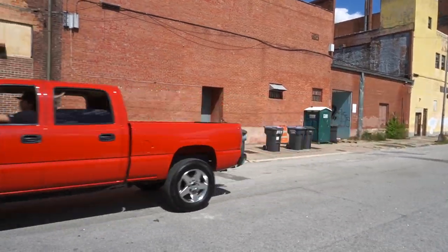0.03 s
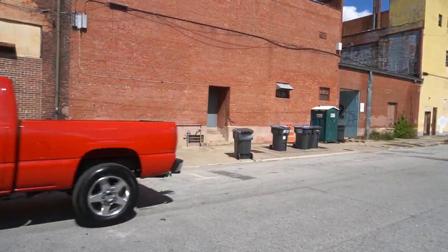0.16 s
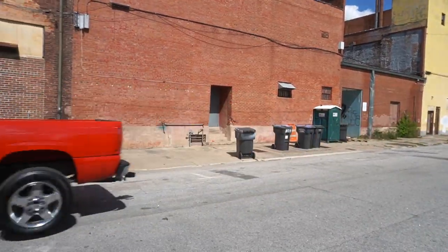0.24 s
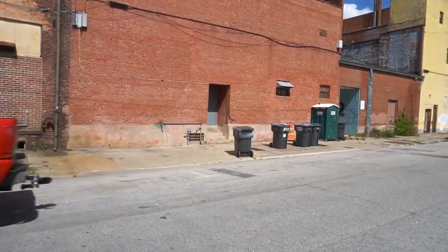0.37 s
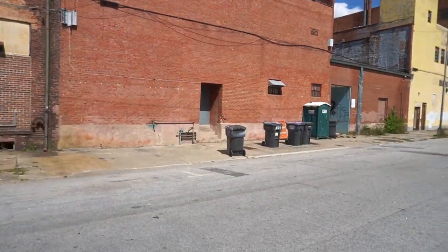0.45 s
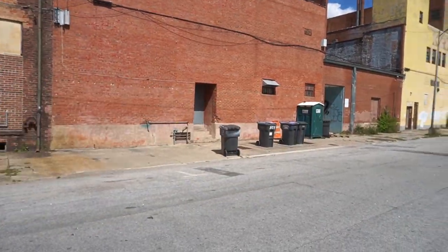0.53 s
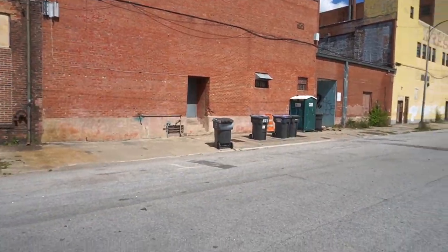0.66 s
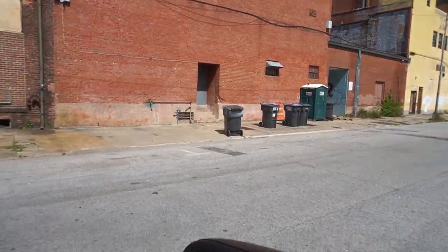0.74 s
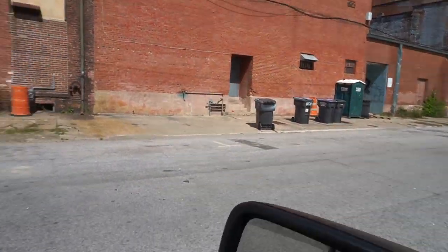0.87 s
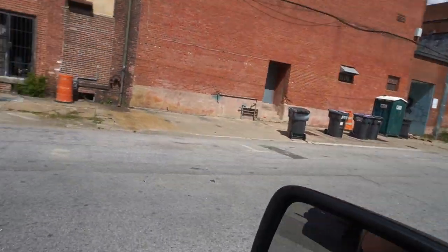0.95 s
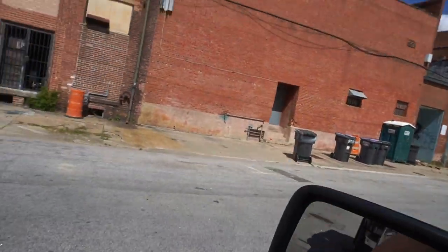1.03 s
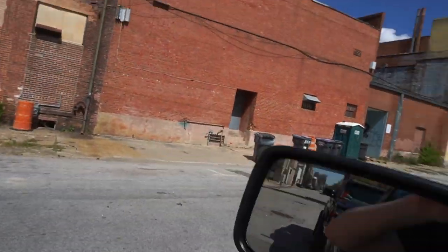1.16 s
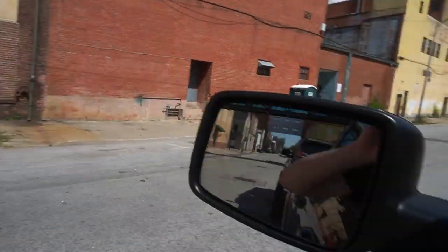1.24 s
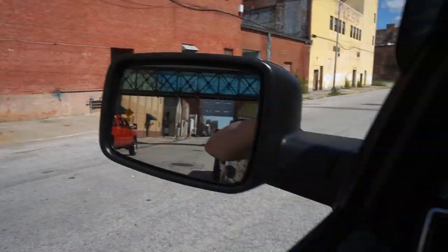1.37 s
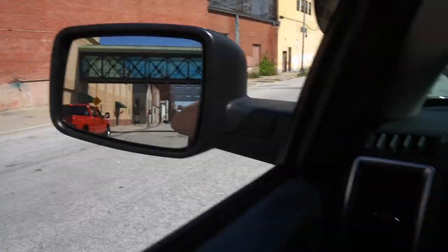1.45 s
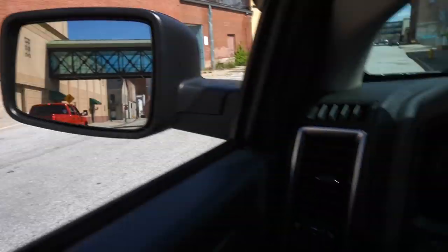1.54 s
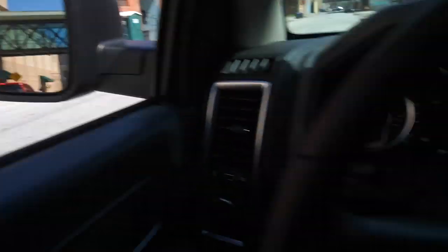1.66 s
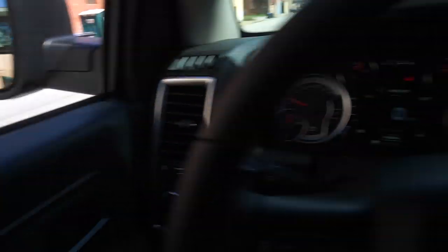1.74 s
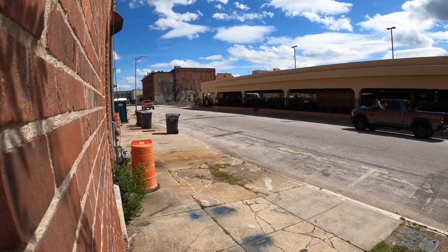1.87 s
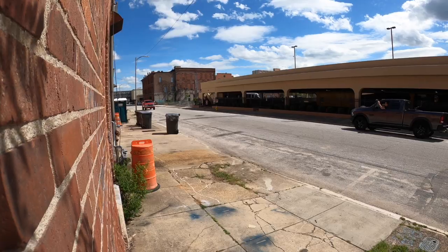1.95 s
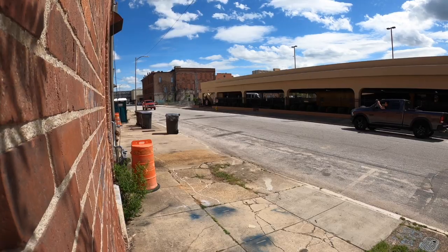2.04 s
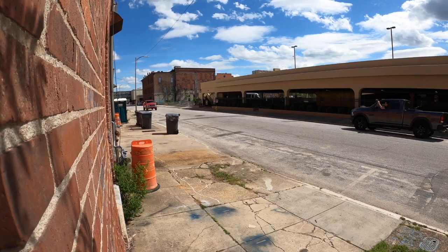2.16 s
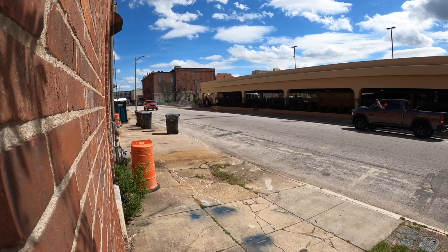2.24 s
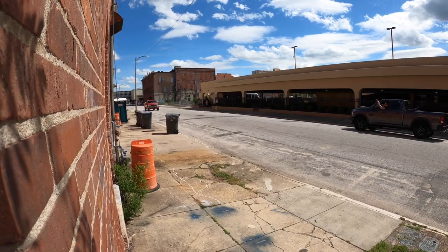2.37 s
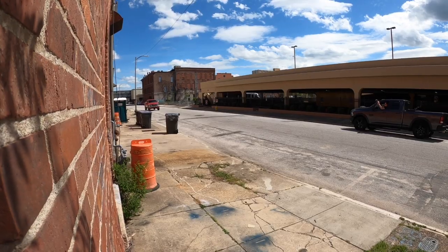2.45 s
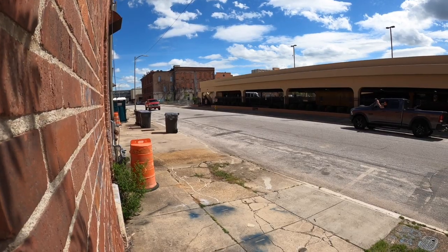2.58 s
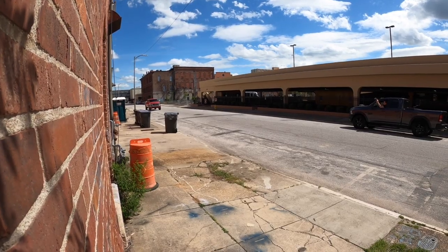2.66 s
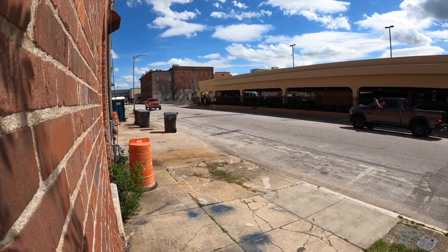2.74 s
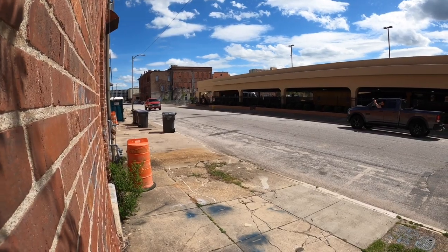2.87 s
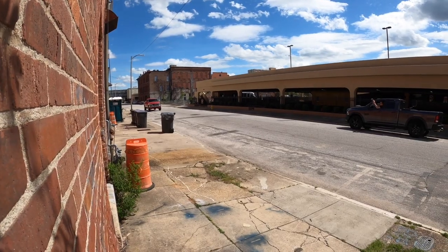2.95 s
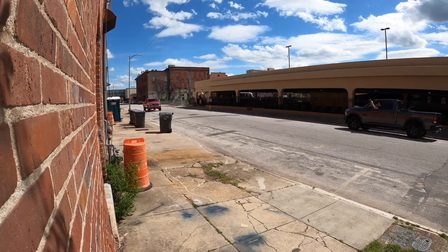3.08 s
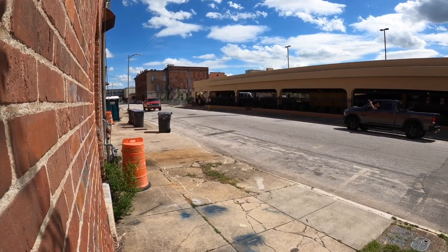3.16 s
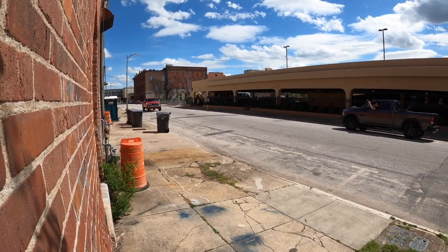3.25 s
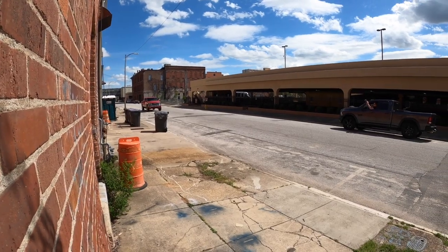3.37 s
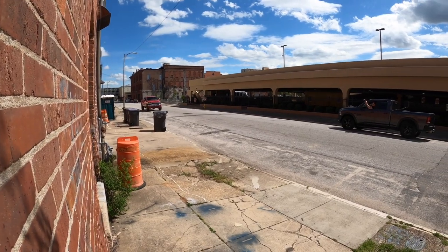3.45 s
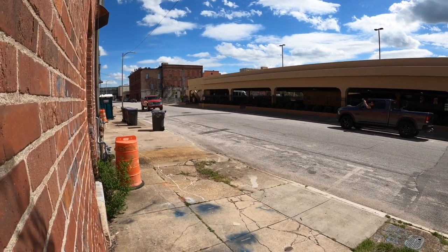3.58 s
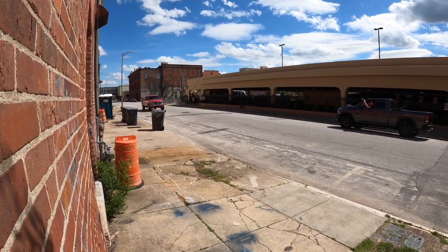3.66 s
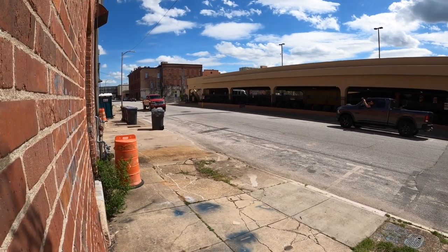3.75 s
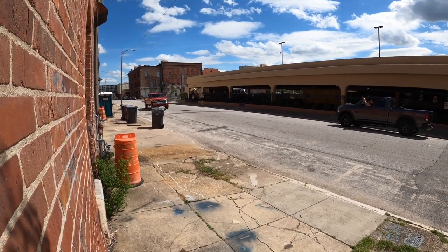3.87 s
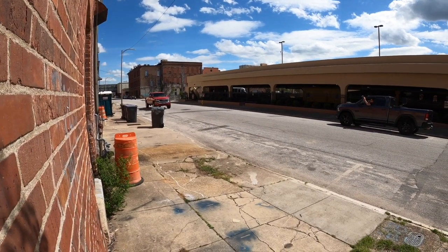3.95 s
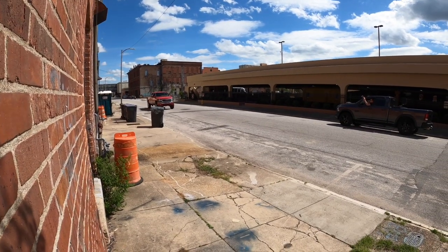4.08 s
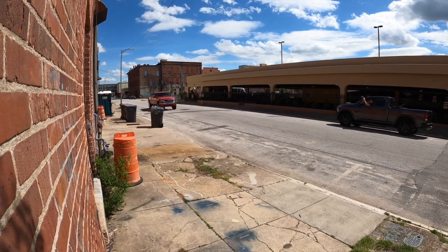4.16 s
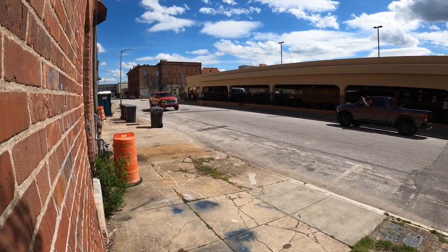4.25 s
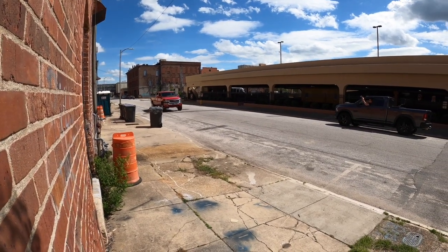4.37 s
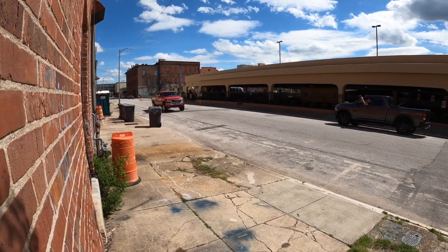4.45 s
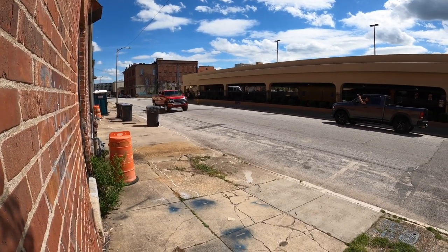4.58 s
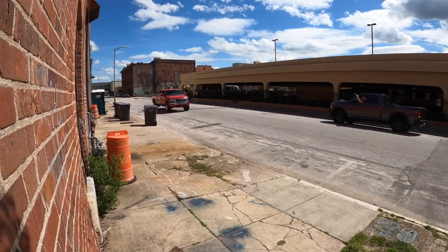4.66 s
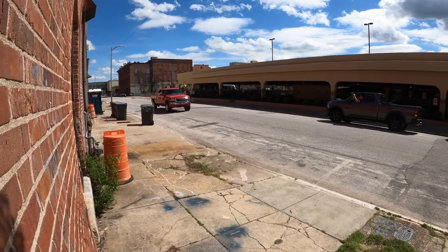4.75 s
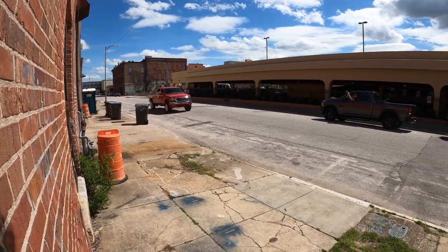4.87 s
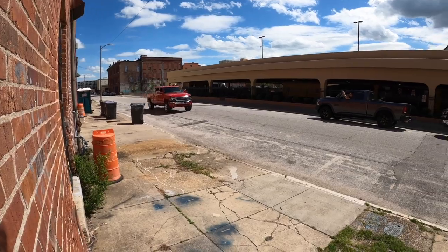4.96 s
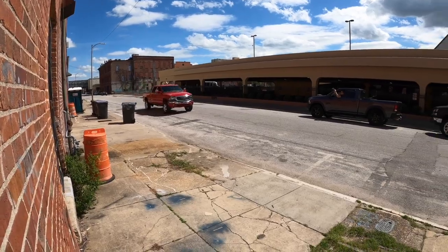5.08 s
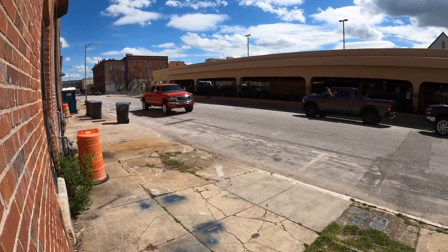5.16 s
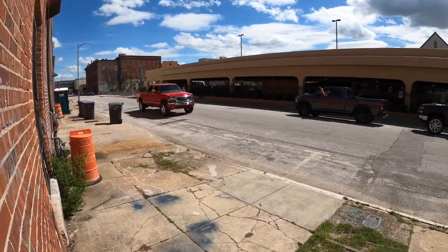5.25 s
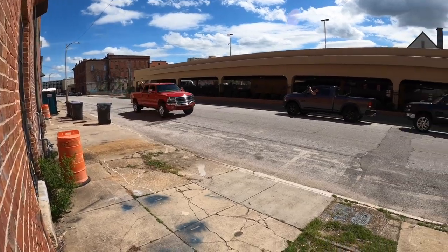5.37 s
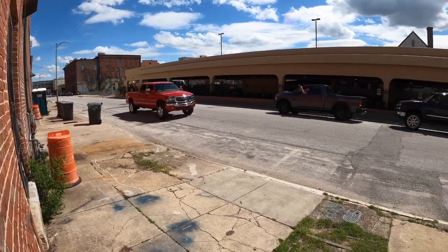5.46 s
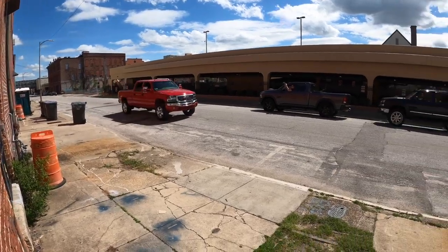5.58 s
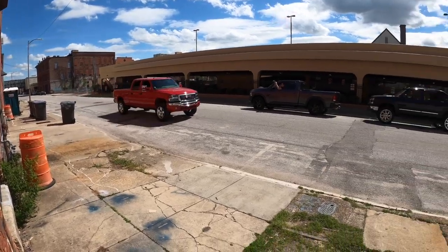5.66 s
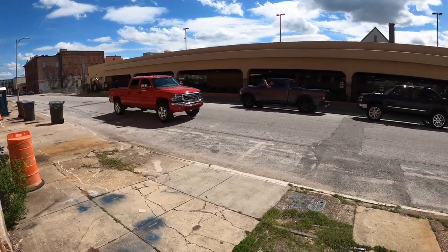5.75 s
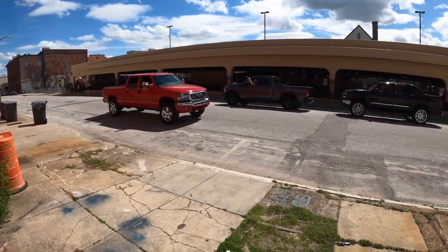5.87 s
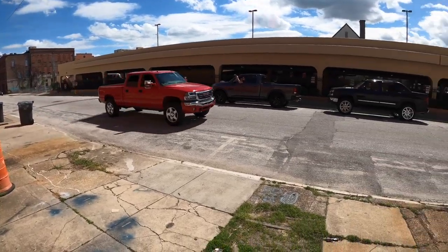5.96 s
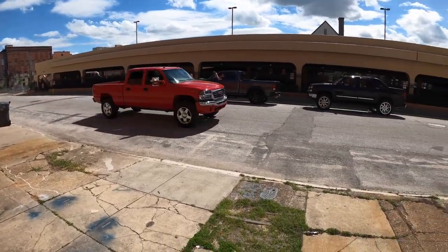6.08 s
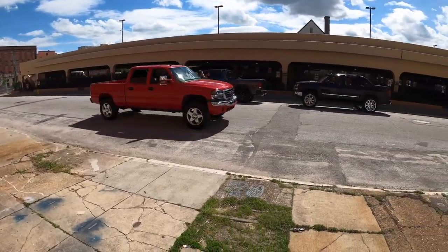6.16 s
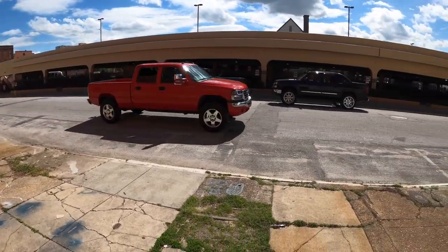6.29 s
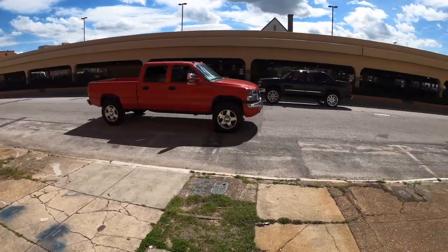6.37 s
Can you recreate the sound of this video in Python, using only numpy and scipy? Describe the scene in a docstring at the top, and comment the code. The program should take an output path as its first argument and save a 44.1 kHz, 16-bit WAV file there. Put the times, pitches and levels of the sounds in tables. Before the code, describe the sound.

Two close outdoor takes of one turbo diesel truck. First, single-channel, it leaves quickly: growl and bright hiss fade, whistle slides down, low wind gusts and a few hoarse chirps appear. Then an abrupt switch to wide stereo at the roadside, with faint idling hums; the same truck comes on from far off, firing note swelling, breathy whistle climbing and echoing off walls.

```python
"""A turbocharged eight-cylinder diesel pickup in a brick-walled street, in two shots joined by a hard cut.
First, in mono from a car window, it rolls away off the throttle, with wind on the microphone and a bird nearby;
then, in stereo from the pavement, it accelerates towards the listener, the turbo whistle climbing over it.
Exhaust, whistle, hums and bird are sums of wavering tones; rumble, roar, hiss, wind, intake and ticks are
filtered noise."""
import sys
import numpy as np
from scipy import signal
from scipy.fft import rfft, irfft, next_fast_len
from scipy.io import wavfile
from scipy.ndimage import uniform_filter1d, map_coordinates

SR = 44100
rng = np.random.default_rng(int(sys.argv[2]) if len(sys.argv) > 2 else 0)


def volts_from_decibels(level):
    """Turn decibel levels (scalar or array-like) into linear amplitude factors."""
    exponent = np.asarray(level, float) / 20
    return 10 ** exponent


def int16_out(signal):
    """Quantize to a 16-bit WAV file."""
    q = np.round(np.clip(np.atleast_2d(signal).T, -1, 1) * 32767)
    wavfile.write(sys.argv[1], SR, q.astype(np.int16))


N = 283122
T = np.arange(N) / SR
CUT_S = 1.8695


def unit(x):
    """Scale to rms 1."""
    return x / np.sqrt(np.mean(np.abs(x) ** 2) + 1e-20)


def power_sum(a_db, b_db):
    """Gain of two unrelated sounds together."""
    return np.hypot(volts_from_decibels(a_db), volts_from_decibels(b_db))


def along(points, hz):
    """Interpolate (f/Hz, value) points on a log frequency axis."""
    f, v = np.transpose(points)
    return np.interp(np.log(hz + 1), np.log(f + 1), v)


def curves(rows):
    """One value per sample for each column after the time."""
    s, *columns = np.transpose(rows)
    return [np.interp(T, s, column) for column in columns]


def filtered(x, response):
    """Multiply the spectrum of x by a response of frequency."""
    m = next_fast_len(N + 8192)
    return irfft(rfft(x, m) * response(np.fft.rfftfreq(m, 1 / SR)), m)[..., :N]


def drift(knots_per_s):
    """Two smooth complex random curves; the knot rate may change with time."""
    at = np.cumsum(knots_per_s * np.ones(N)) / SR
    knots = rng.standard_normal((4, int(at[-1]) + 4))
    a, b, c, d = (map_coordinates(k, [at], order=2) for k in knots)
    return np.array([a + 1j * b, c + 1j * d]) / np.sqrt(2)


def tone(hz, spread_hz, steady):
    """Two draws of a line at a moving pitch, part steady, part smeared by turbulence and moving echoes."""
    cycles = np.cumsum(hz * np.ones(N)) / SR
    carrier = np.exp(2j * np.pi * (cycles + rng.random((2, 1))))
    steady = np.clip(steady, 0, 1)  # share of the power
    envelope = np.sqrt(steady) + np.sqrt(1 - steady) * drift(np.abs(spread_hz) + 1)
    return np.sqrt(2) * np.real(carrier * envelope)


def rush(spectrum, patchy_db):
    """Two coloured noises of rms 1, with time-frequency patches of random gain common to both."""
    z = signal.stft(rng.standard_normal((2, N)), nperseg=512)[2]
    field = rng.standard_normal(z.shape[1:])
    field = uniform_filter1d(uniform_filter1d(field, 6, 0), 12, 1)
    pair = signal.istft(z * volts_from_decibels(patchy_db * unit(field)), nperseg=512)[1][:, :N]
    return unit(filtered(pair, lambda hz: volts_from_decibels(along(spectrum, hz))))


def street(x, wet_db, t60_s=0.57):
    """The walls return a decaying smear, which trails behind a gliding pitch."""
    t = T[:SR // 2]
    tail = rng.standard_normal((2, len(t))) * volts_from_decibels(-60 * t / t60_s) * (t > .012)
    tail /= np.linalg.norm(tail[0])
    return x + volts_from_decibels(wet_db) * signal.fftconvolve(x, tail, axes=1)[:, :N]


def exhaust(rows, level_db, order_db, steady, note_steady):
    """Uneven firings sound every multiple of the cycle; the firing note has its own steadiness and level."""
    firing_hz, note_db = curves(rows)
    pulses = 0
    for order, db in enumerate(order_db, 2):
        if order == 8:
            pulses = pulses + volts_from_decibels(db + note_db) * tone(firing_hz, 13, note_steady)
        else:
            pulses = pulses + volts_from_decibels(db) * tone(order * firing_hz / 8, 12, steady)
    return volts_from_decibels(level_db) * pulses


# Engine, first shot: t/s, firing rate/Hz, extra level of the firing note/dB
ENGINE_AWAY = [(0, 194, 4), (.13, 191, 9), (.22, 168, 1.5), (.5, 165, -6.5), (.8, 141, -1),
               (1.4, 135, -11.5), (1.87, 99, -9)]
# Multiples 2 to 16 of the eight-firing cycle, from behind: relative level/dB
ORDER_AWAY_DB = [-17.5, -10, 3.5, -4.5, -2.5, -4.5, 5.5, -8, -9, -14.5, -10.5, -22, -14, -10.5, -17]


def exhaust_away(fade_db):
    """Firing pulses off the throttle; they take only part of the fading."""
    return exhaust(ENGINE_AWAY, -24 + 0.72 * fade_db, ORDER_AWAY_DB, steady=.65, note_steady=.85)


def turbo(rows, octave_db, breath_db, steady, wet_db):
    """The compressor whistle, a breathy skirt just under it and an octave above, echoed by the street."""
    hz, level_db, spread_hz = curves(rows)
    whistle = tone(hz, spread_hz, steady)
    whistle += volts_from_decibels(breath_db) * tone(.955 * hz, 500, 0)
    whistle += volts_from_decibels(octave_db) * tone(2 * hz, spread_hz + 150, 0)
    return street(volts_from_decibels(level_db) * whistle, wet_db)


# Turbo, first shot: t/s, whistle f/Hz, whistle level/dB, spread/Hz
TURBO_AWAY = [(0, 4580, -25, 394.6), (.13, 4600, -29, 246.8), (.26, 4414, -35, 160.4),
              (.55, 3942, -27, 113.3), (.72, 3728, -28.5, 220), (1, 3432, -35, 319.7),
              (1.2, 3184, -46.5, 198), (1.35, 2992, -41, 100.6), (1.47, 2853, -45.5, 101),
              (1.87, 2465, -52, 90)]
# Octave of the whistle: t/s, level relative to the whistle/dB
OCTAVE_AWAY = [(0, -28), (.36, -23), (.5, -33), (.95, -30), (1.25, -17), (1.87, -7)]


def turbo_away():
    """The whistle sinks and weakens, and its octave grows beside it."""
    return turbo(TURBO_AWAY, octave_db=curves(OCTAVE_AWAY)[0], breath_db=-15, steady=.2, wet_db=-6)


# Low noise, first shot: f/Hz, relative density/dB
RUMBLE_AWAY = [(21, -33), (35, -1), (48, -12), (81, -17), (97, -14.5), (258, -21.5), (280, -21), (400, -25),
               (520, -47), (880, -120)]


def rumble_away(fade_db):
    """Low noise of the truck; it takes about half of the fading."""
    return volts_from_decibels(-18 + 0.55 * fade_db) * rush(RUMBLE_AWAY, patchy_db=1.7)


def roar(spectra, start_s, end_s):
    """Engine and tyre noise whose colour passes from the first spectrum to the second between two set times."""
    turn = np.pi / 2 * np.clip((T - start_s) / (end_s - start_s), 0, 1)
    return np.cos(turn) * rush(spectra[0], 0.74) + np.sin(turn) * rush(spectra[1], 0.28)


# Roar, first shot, two spectra (earlier, later): f/Hz, relative density/dB
ROAR_AWAY = [(150, -22), (250, -7.5), (352, -3.5), (491, -10.5), (1200, -12), (1530, -18.5), (2310, -18),
             (3000, -25), (3900, -57), (6600, -120)], [(150, -48), (250, -9.5), (334, 0), (382, -12),
             (429, -6.5), (630, -9.5), (834, -9.5), (2500, -24), (3250, -35), (5500, -120)]


def roar_away(fade_db):
    """Engine and tyre roar, fading in full."""
    return volts_from_decibels(-16 + fade_db) * roar(ROAR_AWAY, 0.072, 1.13)


# Treble noise, first shot: f/Hz, relative density/dB
HISS_AWAY = [(1500, -35.5), (2800, -1.5), (4000, -3), (5500, -7.5), (7500, -14.5), (9500, -19),
             (12000, -26.5), (15000, -24.5), (16500, -38)]


def hiss_away(fade_db):
    """Treble noise of the truck, fading in full."""
    return volts_from_decibels(-29 + fade_db) * rush(HISS_AWAY, patchy_db=1.5)


# Wind on the microphone: f/Hz, relative density/dB
BUFFET = [(2, -20), (8, -5), (14, 4), (24, -10), (40, -25), (70, -47), (200, -120)]
# Gusts over the steady breeze: t/s, peak level/dB
GUSTS = [(.78, -14), (1.02, -8.5), (1.38, -5.5), (1.68, -13)]


def wind():
    """Very low buffeting: a steady breeze plus gusts that rise and fall at a constant rate in dB."""
    breeze_db, gust_db_per_s = -39, 141
    gain = volts_from_decibels(breeze_db) + sum(volts_from_decibels(db - gust_db_per_s * np.abs(T - s)) for s, db in GUSTS)
    return gain * rush(BUFFET, patchy_db=0)


# Hums at the car window: t/s, upper level/dB, lower level/dB
HUM_SWELL = [(0, -48, -48), (.7, -33.5, -55), (.95, -39.5, -54), (1.45, -42, -43), (1.62, -45, -39),
             (1.87, -58, -24)]


def window_hums():
    """Two hums of fixed pitch with changing levels."""
    upper_db, lower_db = curves(HUM_SWELL)
    return volts_from_decibels(upper_db) * tone(329, 3.6, 1.0) + volts_from_decibels(lower_db) * tone(86, 3.6, 1.0)


# Bright puffs and ticks: t/s, peak level/dB, length/s, lowest f/Hz, relative density at 16 kHz/dB
TICKS = [(.553, -30, 0.04, 4067, -34.5), (.845, -55.5, .012, 9000, -6.5), (0.923, -61, 0.015, 12000, -6),
         (1.385, -56.5, .02, 7040, -7), (1.51, -59, .04, 11900, -15), (1.58, -61, 0.041, 11800, 1),
         (1.841, -36, 0.014, 2010, -47), (2.625, -42.5, .002, 5400, -25),
         (2.6565, -47.5, .002, 5550, -22.5), (2.66, -50, 0.21, 4800, -52)]


def ticks():
    """Bursts of bright noise close to the microphone."""
    out = np.zeros((2, N))
    for s, db, length_s, low_hz, top_db in TICKS:
        shape = np.sin(np.pi * np.clip((T - s) / length_s, 0, 1))
        bright = [(0.23 * low_hz, -60), (low_hz, 0), (16000, top_db)]
        noise = filtered(rng.standard_normal(N), lambda hz: volts_from_decibels(along(bright, hz)))
        out += volts_from_decibels(db) * shape * unit(noise)
    return out


# Chirps: t/s, f/Hz, level/dB, length/s
CHIRPS = [(.993, 7700, -48, .018), (1.036, 8060, -34, .026), (1.185, 7250, -35, .02)]


def bird():
    """Short, slightly hoarse chirps with a weak octave, ringing down the street."""
    out = np.zeros((2, N))
    for s, hz, db, length_s in CHIRPS:
        shape = np.sin(np.pi * np.clip((T - s) / length_s, 0, 1) ** 0.37)  # fast attack
        out += volts_from_decibels(db) * shape * (tone(hz, 900, .7) + volts_from_decibels(-20) * tone(2 * hz, 900, .4))
    return street(out, wet_db=-8, t60_s=.35)


def rolling_away(small):
    """First shot: the truck recedes and quietens as it slows; one microphone, so one channel."""
    start_m, speed_m_per_s, slowing_db_per_s = 3.24, 9.7, 2.5
    fade_db = -20 * np.log10(1 + speed_m_per_s * T / start_m) - slowing_db_per_s * T
    truck = exhaust_away(fade_db) + turbo_away()
    truck += rumble_away(fade_db) + roar_away(fade_db) + hiss_away(fade_db)
    return (truck + wind() + window_hums() + bird() + small)[0]


# Engine, second shot: t/s, firing rate/Hz, extra level of the firing note/dB
ENGINE_NEAR = [(1.87, 155.9, -11), (2.5, 160.8, 3), (2.8, 168.2, -3.5), (3.5, 175.3, 3.5),
               (3.85, 172.1, 1.5), (4.15, 177, 1.5), (4.5, 186.8, 6.5), (5.1, 193.3, 8.5),
               (5.35, 195.1, 5.5), (5.6, 193.9, 13.5), (5.9, 190.4, 6.5), (6.2, 190.3, 5.5),
               (6.42, 178.9, 0)]
# Multiples 2 to 16 of the eight-firing cycle, approaching: relative level/dB
ORDER_NEAR_DB = [-4, -4.5, 3, -1.5, 0, -3, 3, -7.5, -10.5, -9, -14.5, -12, -16.5, -22.5, -14.5]


def exhaust_near():
    """Firing pulses under acceleration."""
    return exhaust(ENGINE_NEAR, -25.5, ORDER_NEAR_DB, steady=.78, note_steady=.75)


# Low noise, second shot: f/Hz, relative density/dB
RUMBLE_NEAR = [(13, -45), (22, -28), (59, -13.5), (96, -8), (134, -7), (167, 1.5), (183, 0), (208, 3),
               (244, -9), (296, -27), (338, -16), (370, -22), (406, -20.5), (456, -31), (500, -26.5),
               (650, -60.5), (1100, -120)]


def rumble_near(near_db):
    """Low noise: a direct part that grows with nearness, and a part the street holds at any distance."""
    return power_sum(-13 + near_db, -22) * rush(RUMBLE_NEAR, patchy_db=1.0)


# Interference from road and wall: f/Hz, gain/dB
GROUND = [(20, -6), (42, 0), (51, -10), (62, 0), (192, 0), (211, -17), (230, 0), (400, 0)]


def over_ground(pipe):
    """Road and wall cut dips into the low end, which swells in after the cut."""
    entry_db = -3.5 * np.exp(-np.abs(T - CUT_S) / 0.11)
    return filtered(volts_from_decibels(entry_db) * pipe, lambda hz: volts_from_decibels(along(GROUND, hz)))


# Roar, second shot, two spectra (earlier, later): f/Hz, relative density/dB
ROAR_NEAR = [(190, -32.5), (330, 0), (449, -5.5), (561, -6.5), (654, -2), (832, -4.5), (1850, -13),
             (2860, -16), (3300, -22.5), (4290, -43.5), (7260, -120)], [(150, -26), (260, 1), (315, -5.5),
             (358, -21), (402, -9.5), (508, -13.5), (931, -10.5), (1880, -17), (2870, -16.5), (3300, -36),
             (4290, -48.5), (7260, -120)]


def roar_near(near_db):
    """Engine and tyre roar, direct and street-held, beating at half the firing rate."""
    beat_hz = curves(ENGINE_NEAR)[0] / 2
    beat = 1 + .13 * tone(beat_hz, 20, .3)[0]
    return power_sum(-22.5 + near_db, -33) * beat * roar(ROAR_NEAR, 5.14, 5.67)


# Treble noise, second shot: f/Hz, relative density/dB
HISS_NEAR = [(1800, -50.5), (3300, -2.5), (4500, -1.5), (5500, -9.5), (7000, -17), (9000, -22.5),
             (11000, -32.5), (14000, -37.5), (16500, -60)]


def hiss_near(near_db, beyond_m):
    """Treble noise, which the air absorbs over the distance."""
    air_db_per_m = 0.1952
    return volts_from_decibels(-32.5 + near_db - air_db_per_m * beyond_m) * rush(HISS_NEAR, patchy_db=0.98)


# Intake: t/s, level/dB
INTAKE_LEVEL = [(1.87, -51), (2.3, -51.5), (3.1, -40), (3.9, -38.5), (4.7, -49), (5.2, -30), (5.6, -36.5),
                (6.2, -30), (6.42, -48)]


def intake():
    """Hollow noise from one broad resonance."""
    centre_hz, width_hz = 2860, 480
    noise = rng.standard_normal((2, N))
    hollow = filtered(noise, lambda hz: 1 / (1 + (2 * (hz - centre_hz) / width_hz) ** 2))
    return volts_from_decibels(curves(INTAKE_LEVEL)[0]) * unit(hollow)


# Hums of machinery and an idling engine further off: f/Hz
DRONE_HZ = 398, 527, 651, 791, 920, 232, 109, 73.5, 39
# The same hums in order: spread/Hz, level before the swell/dB
DRONES = [(14, -42.5), (12, -47), (14, -39), (14, -42.5), (15, -47.5), (8, -31), (7.9, -28), (6, -27),
          (6.7, -30)]
# Swell of the hums above 300 Hz: t/s, gain/dB
DRONE_SWELL = [(1.87, -35), (2.35, 1.5), (3.2, 2), (3.5, -11.5), (4.2, -14.5), (4.8, 2.5), (5.2, 3.5),
               (6.42, -12.5)]


def distant_hums():
    """Hums of fixed pitch: the upper ones swell and ebb, the lower ones sink slowly."""
    upper_db = curves(DRONE_SWELL)[0]
    lower_db = -0.64 * (T - CUT_S)
    out = np.zeros((2, N))
    for hz, (spread_hz, db) in zip(DRONE_HZ, DRONES):
        out += volts_from_decibels(db + (upper_db if hz > 300 else lower_db)) * tone(hz, spread_hz, .88)
    return out


# Turbo, second shot: t/s, whistle f/Hz, whistle level/dB, spread/Hz
TURBO_NEAR = [(1.87, 3780, -41.5, 130.1), (2.35, 3570, -43, 74.9), (2.6, 3500, -42, 99.7),
              (2.82, 3577, -36, 269.3), (3.1, 3690, -37, 318.5), (3.7, 3848, -32, 202.7),
              (4, 3856, -32, 248.5), (4.5, 4076, -31.5, 412.2), (5, 4531, -27.5, 348.2),
              (5.4, 4746, -33, 240), (5.7, 4734, -34, 180.4), (6.1, 4698, -27.5, 151.2),
              (6.25, 4710, -34.5, 111), (6.42, 4400, -33.5, 120)]


def turbo_near():
    """The whistle dips, then climbs, with a strong breathy skirt and a faint octave."""
    return turbo(TURBO_NEAR, octave_db=-35.5, breath_db=-5, steady=0.24, wet_db=-5.0)


# Stereo likeness: f/Hz, left-right correlation
ALIKE = [(60, 1), (220, 1), (410, 0.95), (790, 0.94), (1500, 0.82), (2850, 0.72), (5430, 0.54),
         (9000, 0.27)]
# Stereo balance: f/Hz, left over right/dB
LEAN = [(60, -0.5), (410, 0), (790, 1), (1500, 1.5), (2850, 3), (5430, 1), (9000, -0.5)]


def two_ports(pair):
    """Mix two independent draws into left and right that agree in the bass and part in the treble."""
    def turn(hz):
        return np.arccos(np.clip(along(ALIKE, hz), -1, 1)) / 2

    mid, side = filtered(pair, lambda hz: np.array([np.cos(turn(hz)), np.sin(turn(hz))]))
    stereo = np.array([mid + side, mid - side])
    return filtered(stereo, lambda hz: volts_from_decibels(along(LEAN, hz) * np.array([[.5], [-.5]])))


def approaching(small):
    """Second shot: the truck comes down a lane past the listener, in stereo."""
    speed_m_per_s, pass_s, lane_m = 10.17, 6.16, 10.2
    beyond_m = np.hypot(speed_m_per_s * (pass_s - T), lane_m) - lane_m
    near_db = -20 * np.log10(1 + beyond_m / lane_m)  # 0 when abreast
    pair = over_ground(exhaust_near() + rumble_near(near_db))
    pair += roar_near(near_db) + hiss_near(near_db, beyond_m) + intake()
    pair += distant_hums() + turbo_near() + small
    return two_ports(pair)


def scene():
    """The two shots, cut together without a fade."""
    small = ticks()
    return np.where(T < CUT_S, rolling_away(small), approaching(small))


def roll_off(x):
    """The treble ends steeply here."""
    return signal.sosfilt(signal.butter(12, 15750, fs=SR, output="sos"), x)


def record(dry):
    """The loudest peaks are rounded off."""
    rounded = dry / (1 + np.abs(dry / .98) ** 5) ** (1 / 5)
    return roll_off(rounded)


dry = scene()
out = record(dry)
int16_out(out)
```